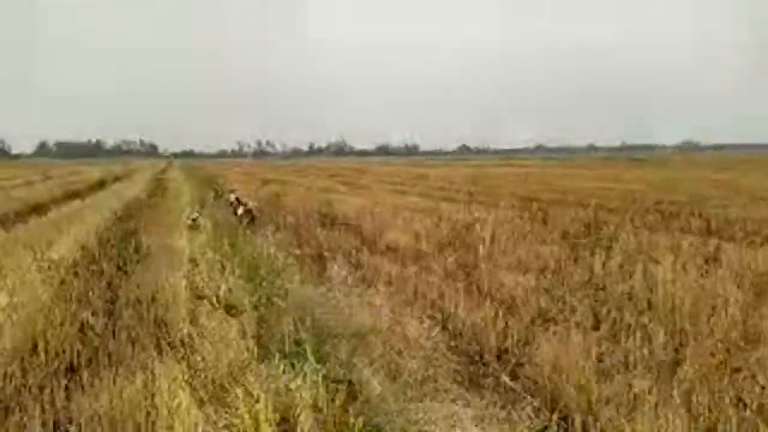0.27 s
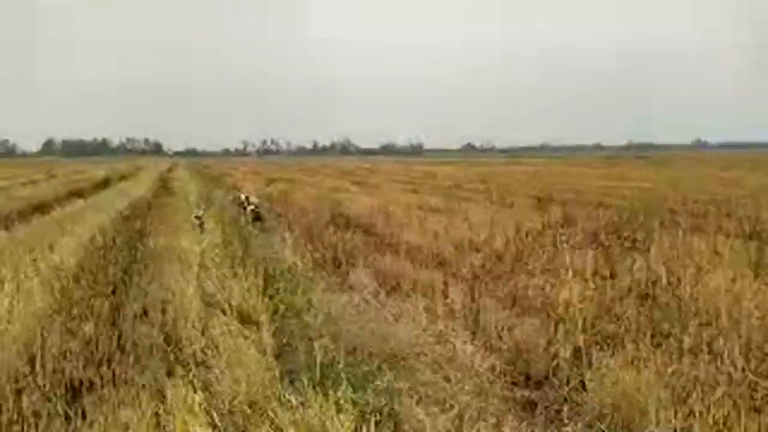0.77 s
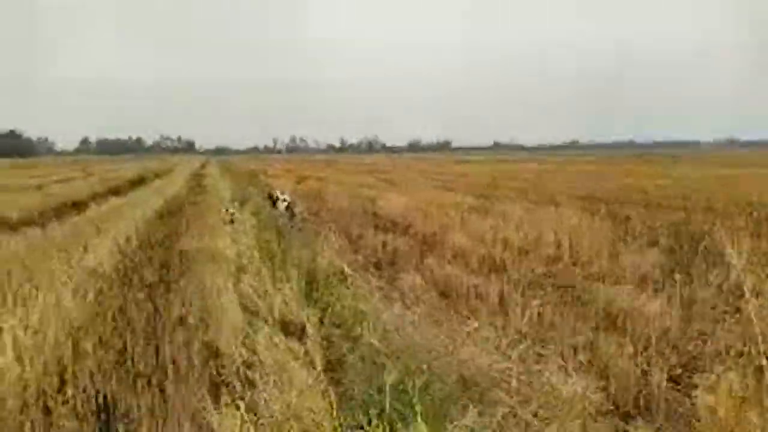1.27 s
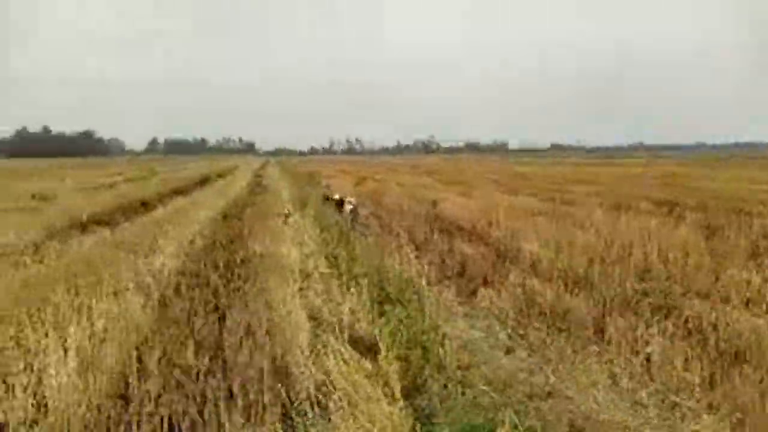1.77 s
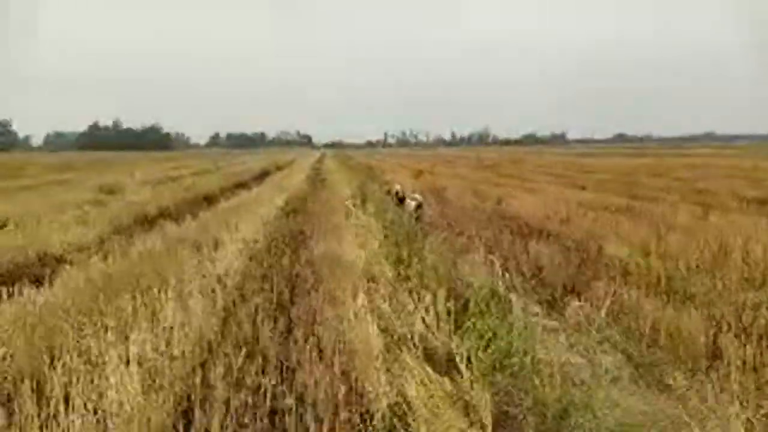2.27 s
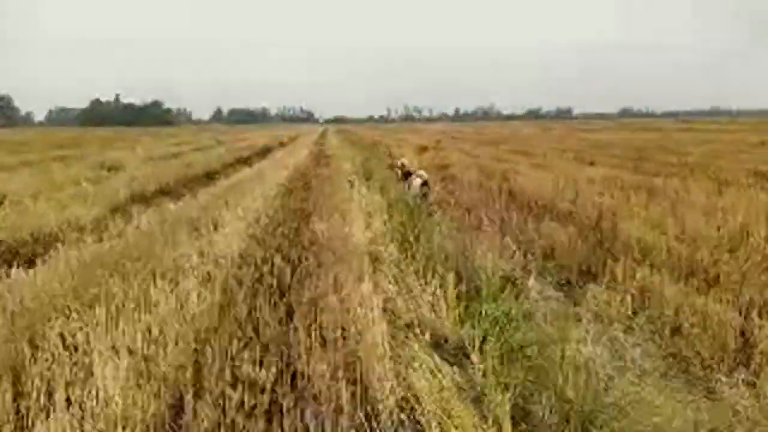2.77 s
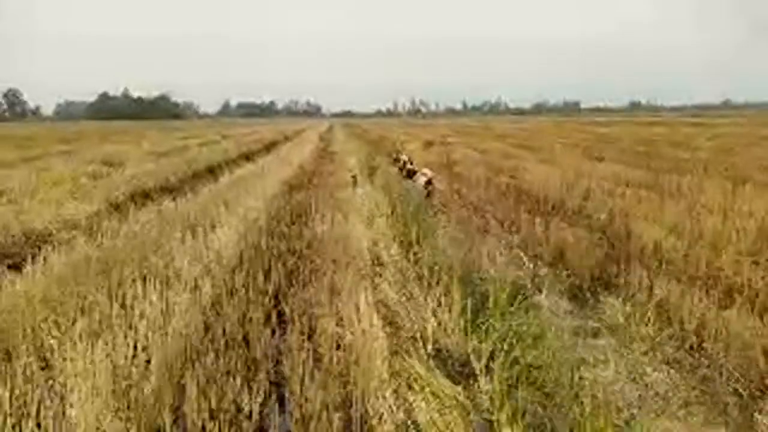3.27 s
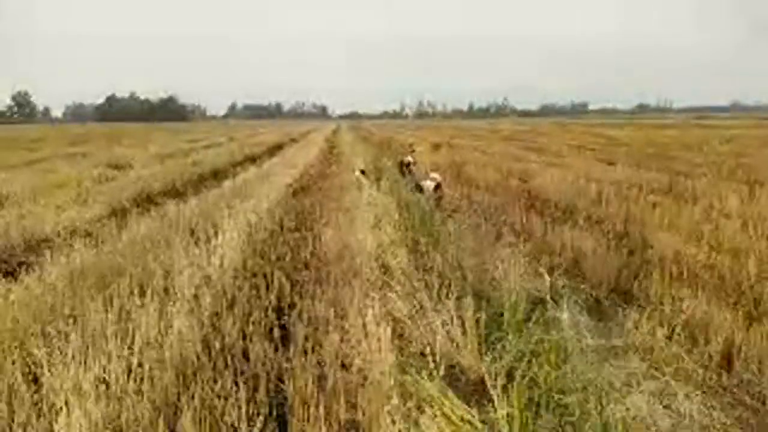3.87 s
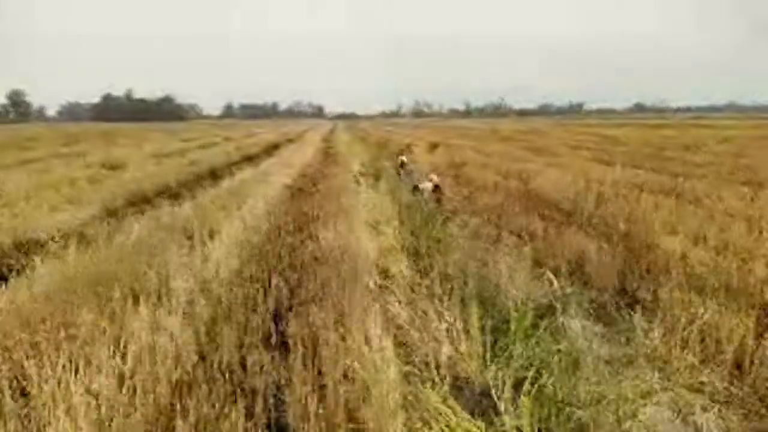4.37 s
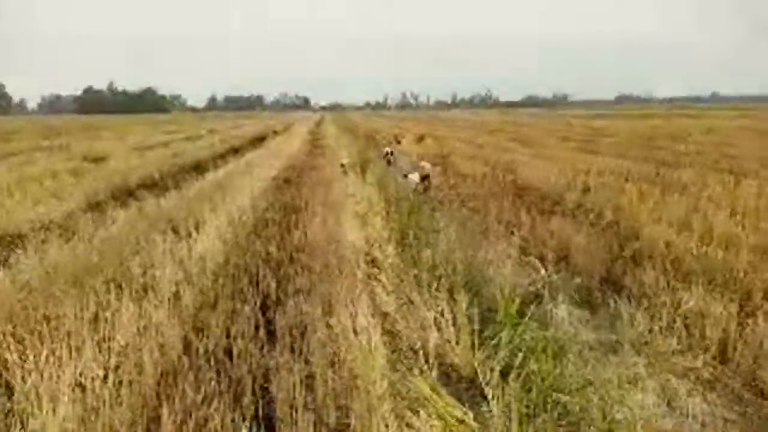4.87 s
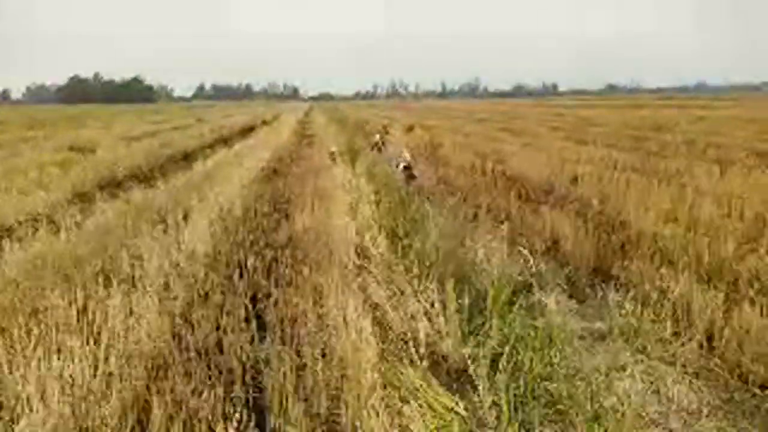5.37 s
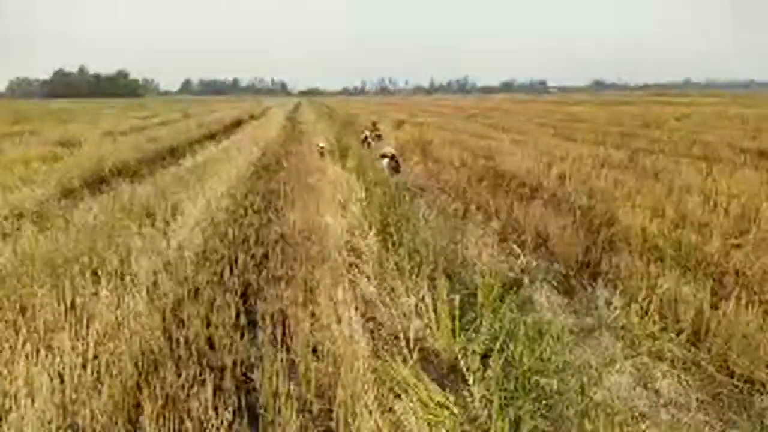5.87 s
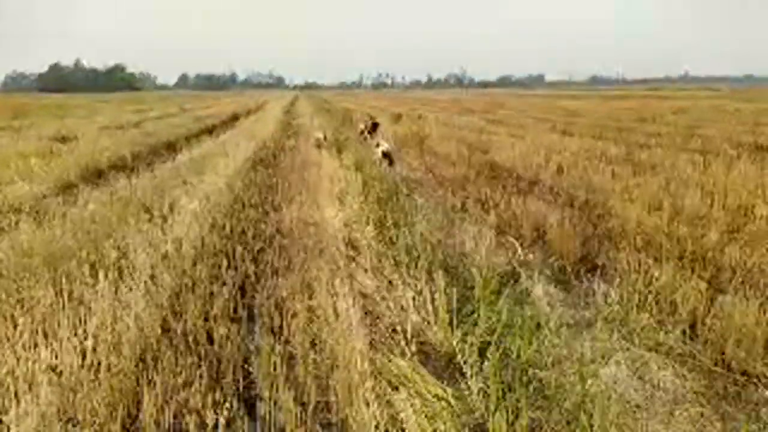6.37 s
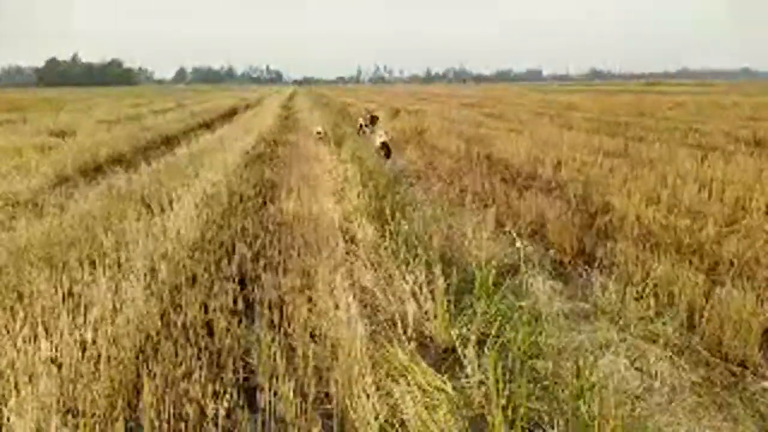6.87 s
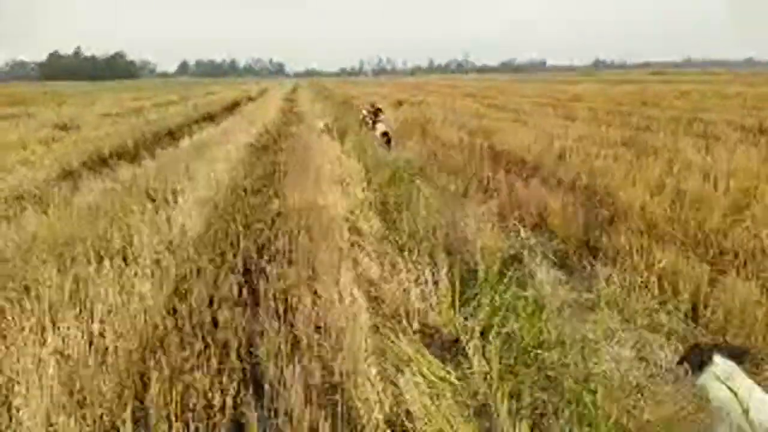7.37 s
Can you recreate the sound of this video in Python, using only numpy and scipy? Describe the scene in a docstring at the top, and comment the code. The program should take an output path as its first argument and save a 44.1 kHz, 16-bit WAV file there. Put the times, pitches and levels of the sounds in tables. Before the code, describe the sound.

Someone walks through crackling dry straw, pauses briefly on damp soil, then goes on swishing and crunching.

```python
"""Footsteps through the dry stubble of a harvested field, dogs trotting along.
Legs sweep the stalks and papery leaves, and friction excites their fibres into a bright, fine rustle.
Underfoot, straw fractures, hollow stalks snap and ring, and pockets in the damp soil squeeze shut.
An engine drones far off, a few faint hoots sound near the end, and a little wind touches the microphone."""
import sys
import numpy as np
from scipy import signal
from scipy.fft import rfft, irfft
from scipy.io import wavfile
from scipy.ndimage import uniform_filter1d

SR = 44100
rng = np.random.default_rng(int(sys.argv[2]) if len(sys.argv) > 2 else 0)


def digitize_waveform(pressure):
    """Quantize a signal to 16-bit integers and store it at the path in sys.argv[1].

    Rows of a 2-D input are taken as channels; values are limited to [-1, 1].
    """
    field = np.atleast_2d(pressure).T
    bounded = np.clip(field, -1, 1)
    quanta = np.round(bounded * 32767).astype(np.int16)
    wavfile.write(sys.argv[1], SR, quanta)


N = 335590

# Levels in the tables are relative; each source applies its own gain.
# a leg sweeps through the stubble: start_s, swell_s, decay_s, leaf_db, stalk_db
LEG_SWEEPS = [(0.043, 0.058, 0.11, -37, -45.5), (0.196, 0.056, 0.1, -34, -44),
              (0.259, 0.092, 0.19, -34.0, -43), (0.53, 0.039, 0.09, -37.5, -51),
              (0.9, 0.053, 0.068, -41.5, -52.0), (1.176, 0.093, 0.048, -37, -44.5),
              (1.605, 0.069, 0.204, -40, -51), (1.838, 0.058, 0.11, -31.5, -40.0),
              (2.014, 0.043, 0.063, -36.5, -42.5), (2.222, 0.13, 0.18, -39.5, -50),
              (2.374, 0.17, 0.1, -37, -43.5), (2.649, 0.17, 0.085, -35.5, -43),
              (2.954, 0.11, 0.018, -37, -51), (3.225, 0.042, 0.25, -43.5, -54.0),
              (3.303, 0.16, 0.14, -43, -52.5), (3.437, 0.15, 0.091, -36.5, -44.5),
              (4.317, 0.11, 0.13, -43.5, -59.5), (4.83, 0.037, 0.16, -46.0, -62),
              (5.112, 0.088, 0.02, -42, -57.0), (5.28, 0.038, 0.15, -47, -60),
              (5.403, 0.035, 0.14, -43.5, -56), (5.67, 0.029, 0.073, -40, -47.5),
              (5.877, 0.03, 0.25, -41, -54), (5.994, 0.085, 0.081, -29.5, -43.0),
              (6.099, 0.056, 0.066, -33.5, -45.5), (6.525, 0.022, 0.21, -40.5, -54),
              (6.619, 0.1, 0.14, -40, -51), (6.697, 0.159, 0.087, -38, -51),
              (6.88, 0.096, 0.18, -35.0, -48), (7.08, 0.081, 0.142, -41.5, -51.5),
              (7.289, 0.048, 0.082, -35, -50.5), (7.398, 0.11, 0.026, -34.5, -55)]
# rustle between sweeps, sinking while the walker pauses: time_s, leaf_db, stalk_db
RUSTLE_FLOOR = [(0.0, -44.5, -52.5), (0.7, -43.5, -54), (1.1, -45.0, -54.5), (1.6, -41.5, -52),
                (2.6, -40.5, -51.5), (3.2, -42.5, -53), (3.9, -45, -56), (4.3, -51.5, -60.5),
                (4.75, -54, -70), (5.0, -50, -60.5), (5.8, -47.5, -61.5), (6.3, -41, -54),
                (6.9, -42.5, -62.5), (7.61, -37, -54)]
# brightness of the rustle, as the weight of the leaf tips: time_s, level_db
TIP_BALANCE = [(0, -0.5), (1.3, -4), (2.5, -1.5), (4.3, -1.5), (5.2, -7.5), (6.3, -5.5), (6.6, -2),
               (7.3, -5.5), (7.61, -7)]
# spectra of rubbed leaves, leaf tips, stalks, thick stalks and cracking straws: frequency_hz, level_db
LEAF_SPECTRUM = [(7300, -17), (7800, -21.5), (8150, -4.5), (9300, -3), (10000, 0), (11600, -1),
                 (12500, -2.5), (15000, -11.5)]
TIP_SPECTRUM = [(8000, -20), (11000, -5.5), (12500, -8.5), (16000, -3.5)]
STALK_SPECTRUM = [(4600, -37), (5300, 2), (6200, 2.5), (7300, -0.5), (9000, 1), (12000, -39)]
THICK_SPECTRUM = [(3500, -26), (4100, -4), (4900, 0.5), (5600, -19)]
CRACKLE_SPECTRUM = [(2500, -17), (4500, -3), (7000, -5.5), (9000, -1), (15000, -4)]
# a foot loads the straw: start_s, swell_s, decay_s, buckling_db, splintering_db, mat_db
FOOT_LOADS = [(0.04, 0.042, 0.15, -47, -48, -57), (0.21, 0.054, 0.118, -45.5, -44.5, -70),
              (0.249, 0.098, 0.095, -43.5, -43, -51.0), (0.386, 0.042, 0.068, -42.5, -43.5, -61),
              (0.53, 0.036, 0.14, -53, -52.5, -58.5), (0.868, 0.1, 0.046, -49, -54, -67),
              (1.22, 0.043, 0.08, -41.5, -43, -52.5), (1.366, 0.097, 0.14, -49, -65, -59),
              (1.62, 0.078, 0.11, -48.5, -49.5, -74), (1.785, 0.13, 0.13, -47, -44.0, -54),
              (1.925, 0.063, 0.016, -42, -47.0, -63.5), (2.003, 0.073, 0.058, -44.5, -45, -73),
              (2.382, 0.17, 0.09, -46, -44, -56.5), (2.6, 0.058, 0.077, -48, -61, -58.5),
              (2.769, 0.127, 0.03, -45.0, -54, -60), (3.381, 0.063, 0.17, -54, -49, -79.5),
              (3.417, 0.15, 0.17, -46.5, -45.5, -65.5), (4.95, 0.14, 0.021, -53.5, -66, -95.5),
              (5.094, 0.046, 0.046, -45, -66, -82), (5.29, 0.055, 0.097, -50.5, -57, -94.5),
              (5.438, 0.023, 0.14, -50.5, -65, -62), (5.68, 0.037, 0.16, -48, -53, -64.5),
              (5.864, 0.048, 0.071, -46.5, -52, -52.5), (5.972, 0.15, 0.2, -46.5, -51.0, -61),
              (6.76, 0.05, 0.31, -53.5, -57, -88.0), (6.95, 0.044, 0.11, -47.5, -52.5, -61),
              (7.276, 0.074, 0.047, -51, -68, -94), (7.438, 0.065, 0.047, -59, -57, -57.5)]
# crunch between footfalls: time_s, buckling_db, splintering_db, mat_db
CRUNCH_FLOOR = [(0.0, -53, -52, -70), (0.85, -55.5, -59, -70), (1.5, -51, -55, -79),
                (2.2, -53.0, -54.0, -72), (2.75, -48, -50, -69), (3.2, -54.5, -55, -72),
                (3.7, -56, -55.5, -82.0), (4.03, -63, -62, -89), (4.15, -78.5, -86, -86.5),
                (4.92, -74.5, -86, -91), (5.02, -69, -78, -88), (5.28, -69, -85, -83),
                (5.67, -80, -92, -95), (6.2, -61, -87, -93), (6.53, -65.5, -75, -91), (6.7, -58, -60, -80),
                (7.1, -54.0, -65.5, -73), (7.61, -57, -64, -76)]
# spectra of buckling straw, splinters and the trodden mat: frequency_hz, level_db
STRAW_SPECTRUM = [(950, -37.5), (1220, -8.5), (1500, -1.5), (1750, -2.5), (2150, -3), (2450, -8),
                  (2900, -37.5)]
SPLINTER_SPECTRUM = [(1900, -33), (2350, -0.5), (2700, 0), (3400, -0.5), (3900, -2), (4500, -10),
                     (5500, -26)]
MAT_SPECTRUM = [(520, -17), (720, -10.5), (880, -5.5), (1080, 1.5), (1300, -2.5), (1700, -16.5),
                (2300, -36.5)]
# thick stalks breaking: start_s, level_db, pitch_hz, splinter_offset_db
STALK_SNAPS = [(0.065, -28, 1620, -20), (0.094, -26.5, 4000, -11), (0.243, -26, 3000, -10),
               (0.288, -27.5, 1690, -18), (0.416, -23, 1650, -19), (0.553, -29.5, 1280, -5),
               (0.563, -25.5, 2900, -17), (0.573, -26, 1780, -9), (0.644, -25.5, 1150, -32),
               (0.691, -27.5, 1490, -37), (0.978, -29, 3430, -18), (1.245, -31, 2070, -8),
               (1.269, -28, 1520, -9), (1.278, -26.5, 2260, -13), (1.679, -29, 2100, -12),
               (1.883, -26.5, 1870, -0.5), (1.912, -32, 2760, -12), (1.985, -28, 1880, -12),
               (2.029, -31, 2840, -13), (2.111, -39, 1030, -7), (2.132, -35.5, 2350, -2),
               (2.282, -35, 2820, -9), (2.357, -31, 2670, -5), (2.828, -32, 3980, -8),
               (2.872, -31.5, 1650, -9), (2.882, -30, 1890, -6), (2.899, -34, 1600, -18),
               (3.059, -35, 3150, -0.5), (3.1, -35, 2150, -12), (3.361, -28.5, 2120, -9),
               (3.572, -34, 1440, -11), (3.688, -32.5, 2560, -6), (3.851, -38, 2380, -17),
               (3.972, -43, 3400, -5), (5.119, -40, 3960, -17), (5.14, -24.5, 1790, -36),
               (5.47, -34.5, 990, -17), (5.697, -32.5, 1780, -13), (5.718, -33, 1440, -17),
               (5.85, -39.5, 3000, 0.5), (5.904, -27.5, 1280, -23), (5.911, -30, 980, -24),
               (6.087, -32, 1750, 2), (6.991, -26.5, 1440, -6.5), (7.098, -35.5, 2310, -5)]
# thin straws flicking: start_s, level_db
STRAW_TICKS = [(0.0944, -26), (0.2463, -18), (0.5544, -21), (0.728, -16.5), (0.819, -22), (1.753, -22),
               (2.135, -19.5), (4.3834, -36), (4.978, -34), (5.19, -32), (5.308, -31), (5.38, -29),
               (5.4228, -29.5), (5.8286, -31), (6.088, -19), (6.9884, -19), (7.433, -17.5), (7.5033, -24)]
# damp ground squishing: start_s, level_db, pitch_hz, length_s
MUD_SQUISHES = [(1.088, -39.5, 1067, 0.046), (1.47, -46.5, 867, 0.079), (1.803, -43, 2320, 0.069),
                (4.245, -55.5, 1490, 0.079), (4.299, -58, 1710, 0.081), (4.45, -54, 1410, 0.061),
                (4.59, -61, 1650, 0.07), (4.631, -61, 2080, 0.042), (4.751, -53, 1425, 0.071),
                (4.78, -51, 2090, 0.065), (4.939, -50.5, 1950, 0.12), (5.045, -37, 2110, 0.057),
                (5.175, -42, 2300, 0.035), (5.31, -39, 1950, 0.1), (5.456, -43, 980, 0.061),
                (5.942, -39, 1190, 0.049), (7.468, -42, 1730, 0.066)]
# dull knocks on the ground: start_s, level_db, pitch_hz
CLOD_KNOCKS = [(0.09, -54.5, 268), (2.183, -44, 510), (3.078, -57, 560), (4.401, -60, 550),
               (4.753, -59, 534)]
# far hoots: start_s, length_s, level_db
HOOT_BURSTS = [(6.552, 0.046, -59.5), (6.661, 0.089, -59.5), (6.783, 0.036, -61.5), (7.178, 0.025, -58),
               (7.328, 0.035, -69), (7.38, 0.06, -65.5)]
# partials of a hoot: pitch_hz, level_db
HOOT_PARTIALS = [(535, -6), (601, -1.5)]
# harmonics of the engine's firing rate: harmonic_number, level_db
ENGINE_HARMONICS = [(1, -74.5), (3, -73.5), (4, -84)]
# strength of the wind on the microphone: time_s, level_db
GUST_LEVEL = [(0, -92), (5.1, -92), (5.25, -64), (5.45, -74), (5.6, -62.5), (5.82, -61), (5.92, -73),
              (6.2, -89), (7.61, -77)]
# spectra of that wind and of the open air: frequency_hz, level_db
WIND_SPECTRUM = [(25, -26), (50, -15), (75, -2), (110, -5), (160, -17.5), (300, -38), (1000, -62)]
AIR_SPECTRUM = [(25, -40), (45, -10), (65, -5.5), (110, 3), (170, -1), (300, -6), (550, -9), (900, -17),
                (3000, -55), (15000, -19)]


def rustle():
    """Stick-slip friction: legs rub stalks, papery leaves and their tips, and each slip rings a fibre."""
    leaf_gain, stalk_gain = strokes(LEG_SWEEPS, RUSTLE_FLOOR, uneven_db=0.75)
    tip_db, = in_time(TIP_BALANCE)
    # thick stalks rub only under a firm sweep and fade out below it
    firm_db, fade_db_per_db = -56, 1.7
    thick_db = fade_db_per_db * np.minimum(20 * np.log10(stalk_gain) - firm_db, 0)
    leaves = leaf_gain * from_db(-1.44) * fibres(
        LEAF_SPECTRUM, per_s=14000, spread_db=0, clump_db=1.5, damping=0.016, patchy_db=3.5, count=32)
    tips = leaf_gain * from_db(tip_db + 2) * fibres(
        TIP_SPECTRUM, per_s=16000, spread_db=2, clump_db=0.5, damping=0.55, patchy_db=2.5, count=8)
    stalks = stalk_gain * from_db(-1.5) * fibres(
        STALK_SPECTRUM, per_s=7900, spread_db=1.5, clump_db=1.6, damping=0.072, patchy_db=3, count=16)
    thick = stalk_gain * from_db(thick_db - 8) * fibres(
        THICK_SPECTRUM, per_s=2500, spread_db=1.5, clump_db=1.8, damping=0.06, patchy_db=3, count=8)
    return leaves + tips + stalks + thick + crackle(stalk_gain * from_db(thick_db))


def crackle(stir_gain, per_s=22, spread_db=3):
    """A Poisson process: stray straws crack at random, as strongly as the stubble is stirred."""
    sizes = from_db(-4 + spread_db * np.minimum(rng.exponential(1, N), 3))
    clicks = stir_gain * sizes * (rng.random(N) < per_s / SR)
    out = np.zeros(N)
    for at in np.flatnonzero(clicks):
        add(out, at / SR, 10 * clicks[at] * fracture(decay_s=0.0012, size=600))
    return coloured(out, CRACKLE_SPECTRUM)


def crunch():
    """Buckling under load: straw folds and splinters beneath the sole, and the mat is pressed flat."""
    buckling, splintering, pressing = strokes(FOOT_LOADS, CRUNCH_FLOOR, uneven_db=1.32)
    straw = buckling * from_db(-2.35) * fibres(
        STRAW_SPECTRUM, per_s=2500, spread_db=1.5, clump_db=1.5, damping=0.04, patchy_db=3, count=18)
    splinters = splintering * from_db(-0.22) * fibres(
        SPLINTER_SPECTRUM, per_s=3000, spread_db=2.5, clump_db=1.5, damping=0.31, patchy_db=0.5, count=12)
    mat = pressing * from_db(2.5) * fibres(
        MAT_SPECTRUM, per_s=1200, spread_db=3, clump_db=1.5, damping=0.074, patchy_db=4, count=12)
    return straw + splinters + mat


def strokes(rows, floor, uneven_db, rest_s=0.24):
    """Incoherent sources add in power: strokes swell and decay over a floor, giving one gain a layer."""
    t = np.arange(N) / SR
    power = from_db(in_time(floor)) ** 2
    for start_s, swell_s, decay_s, *layers_db in rows:
        span = slice(int(start_s * SR), int(start_s * SR) + SR)
        age_s = t[span] - start_s
        past_peak_s = np.maximum(age_s - swell_s, 0)
        # the leg has passed, or the foot is still, about rest_s after the peak
        decay = np.exp(-past_peak_s / decay_s - (past_peak_s / rest_s) ** 4)
        envelope = np.clip(age_s / swell_s, 0, 1) * decay
        power[:, span] += np.outer(from_db(layers_db), envelope) ** 2
    return np.sqrt(power) * from_db(uneven_db * drift(per_s=19.7))  # stalks give way unevenly


def fibres(spectrum, per_s, spread_db, clump_db, damping, patchy_db, count):
    """Impulse excitation: clumps of tiny slips and breaks ring a bank of fibres, held near unit power."""
    clumps = from_db(clump_db * drift(per_s=45))
    at = np.flatnonzero(rng.random(N) < per_s * clumps / SR)
    sizes = from_db(spread_db * np.minimum(rng.exponential(1, N)[at], 5))
    impulses = sizes * rng.choice([-1, 1], N)[at] * np.sqrt(clumps[at])
    fibre_index = rng.integers(0, count, N)[at]
    rings = 0
    for k, hz in enumerate(np.geomspace(spectrum[0][0], spectrum[-1][0], count)):
        clicks = np.full(N, 1e-18)
        struck = fibre_index == k
        # the fibres caught keep changing, so the colour shifts
        clicks[at[struck]] = impulses[struck] * from_db(patchy_db * drift(per_s=12.2)[at[struck]])
        rings = rings + resonate(clicks, hz, width_hz=damping * hz)
    rings = coloured(rings, spectrum)
    local_power = np.abs(uniform_filter1d(rings ** 2, size=3000))
    return rings / np.sqrt(local_power + 1e-12)


def fracture(decay_s, size=3000):
    """Brittle fracture: a flurry of tiny breaks dies away exponentially."""
    breaks = rng.choice([-1, 1], size) * rng.uniform(0.17, 1, size)
    return breaks * np.exp(-np.arange(size) / SR / decay_s)


def snaps():
    """Tube resonance: a hollow stalk rings briefly as it breaks; splinters crack over a wide band."""
    out = np.zeros(N)
    for start_s, level_db, hz, splinter_db in STALK_SNAPS:
        crack = fracture(decay_s=0.0029 * (1800 / hz) ** 0.3)  # thicker, lower stalks break more slowly
        tube = resonate(band(crack, 0.68 * hz, 1.52 * hz, order=3), hz, width_hz=0.17 * hz)
        splinters = band(crack, 1860, 7800, order=3)
        add(out, start_s, peak_at(tube, level_db - 3.5) + peak_at(splinters, level_db + splinter_db + 6.5))
    return out


def ticks():
    """Elastic release: thin straws spring free with a very short, bright click."""
    out = np.zeros(N)
    for start_s, level_db in STRAW_TICKS:
        click = band(fracture(decay_s=0.00094), 9400, 17700, order=3)
        add(out, start_s, peak_at(resonate(click, hz=9100, width_hz=5900), level_db))
    return out


def squishes():
    """Cavity resonance: air and water are squeezed from a mud pocket, whose note rises as it closes."""
    out = np.zeros(N)
    for start_s, level_db, hz, length_s in MUD_SQUISHES:
        progress = np.arange(9000) / SR / length_s
        flow = rng.standard_normal(2 * len(progress))
        hollow = resonate(resonate(flow, hz, width_hz=0.088 * hz), hz, width_hz=0.16 * hz)
        pitch_ratio = 1 + 0.121 * (np.minimum(progress, 1) - 0.3)
        rising = np.interp(np.cumsum(pitch_ratio), np.arange(len(hollow)), hollow)
        envelope = np.sqrt(progress) * np.exp(-3.5 * progress)
        add(out, start_s, peak_at(rising * envelope, level_db - 4))
    return out


def knocks():
    """Damped resonance: a clod of earth gives under a foot with a dull knock."""
    out = np.zeros(N)
    for start_s, level_db, hz in CLOD_KNOCKS:
        impact = band(fracture(decay_s=0.0012), 0.91 * hz, 1.11 * hz)
        add(out, start_s, peak_at(resonate(impact, hz, width_hz=130), level_db - 0.5))
    return out


def hoots(attack_s=0.022, decay_s=0.023):
    """Random modulation roughens two close partials into a hollow tone, heard far off in short bursts."""
    t = np.arange(N) / SR
    envelope, tone = np.zeros(N), np.zeros(N)
    for start_s, length_s, level_db in HOOT_BURSTS:
        attack = np.clip((t - start_s) / attack_s, 0, 1)
        release = np.exp(-np.maximum(t - start_s - length_s, 0) / decay_s)
        envelope += from_db(level_db + 5) * attack * release
    for hz, level_db in HOOT_PARTIALS:
        gain = from_db(level_db + 4.2 * drift(per_s=43))
        pitch_hz = hz * (1 + 0.0187 * drift(per_s=26.4))
        tone += gain * np.sin(2 * np.pi * np.cumsum(pitch_hz) / SR)
    return envelope * tone


def engine(firing_hz=68.14):
    """Periodic firing gives a harmonic series: a far engine drones on a few low, wavering harmonics."""
    phase = 2 * np.pi * np.cumsum(firing_hz * (1 + 0.0042 * drift(per_s=3.8))) / SR
    return sum(np.sqrt(2) * from_db(level_db + 1.2 * drift(per_s=1.6)) * np.sin(harmonic * phase)
               for harmonic, level_db in ENGINE_HARMONICS)


def wind():
    """Turbulence: an uneven gust buffets the microphone over the low murmur of open air."""
    gust_db, = in_time(GUST_LEVEL)
    air = from_db(-68.5) * rms_one(coloured(rng.standard_normal(N), AIR_SPECTRUM))
    gust_gain = from_db(gust_db + 2 * drift(per_s=14))
    return air + gust_gain * rms_one(coloured(rng.standard_normal(N), WIND_SPECTRUM))


def resonate(x, hz, width_hz):
    """A damped two-pole resonator with unit gain at its peak."""
    radius = np.exp(-np.pi * width_hz / SR)
    feedback = [1, -2 * radius * np.cos(2 * np.pi * hz / SR), radius ** 2]
    return signal.lfilter(np.array([1, 0, -1]) * (1 - radius ** 2) / 2, feedback, x)


def band(x, low_hz, high_hz, order=2):
    """A maximally flat band-pass filter."""
    return signal.sosfilt(signal.butter(order, [low_hz, high_hz], "band", fs=SR, output="sos"), x)


def coloured(x, spectrum, size=8192):
    """A minimum-phase filter follows a spectrum and falls away beyond its ends."""
    hz, db = np.transpose(spectrum)
    octave = np.log2(np.maximum(np.arange(size // 2 + 1) * SR / size, 1))
    octaves_beyond = np.abs(octave - np.clip(octave, np.log2(hz[0]), np.log2(hz[-1])))
    response_db = np.interp(octave, np.log2(hz), db) - 20 * np.minimum(octaves_beyond, 2)
    cepstrum = irfft(np.log(from_db(response_db)))
    # folding the cepstrum onto positive time makes the filter causal
    cepstrum[1:size // 2] *= 2
    cepstrum[size // 2 + 1:] = 0
    return signal.oaconvolve(x, irfft(np.exp(rfft(cepstrum))))[:N]


def drift(per_s):
    """Low-passed noise of unit power that changes about per_s times a second."""
    hop, warm_up = 40, 2000
    pole = np.exp(-2 * np.pi * hop * per_s / SR)
    noise = rng.standard_normal(N // hop + warm_up + 2)
    slow = signal.lfilter([1], [1, -2 * pole, pole ** 2], noise)[warm_up:]
    return np.interp(np.arange(N) / hop, np.arange(len(slow)), rms_one(slow))


def in_time(rows):
    """Linear interpolation of each column of a curve, sample by sample."""
    time_s, *columns = np.transpose(rows)
    return [np.interp(np.arange(N) / SR, time_s, column) for column in columns]


def from_db(db):
    """Decibels to amplitude ratio."""
    return 10 ** (np.asarray(db) / 20)


def rms_one(x):
    """Normalisation to unit power."""
    return x / np.sqrt(np.mean(x ** 2) + 1e-20)


def peak_at(x, db):
    """Normalisation to a peak level."""
    return from_db(db) * x / np.abs(x).max()


def add(out, start_s, sound):
    """Superposition of a short sound at a given time."""
    at = round(start_s * SR)
    out[at:at + len(sound)] += sound[:N - at]


def scene():
    """Superposition: all sources sum at one microphone, heard alike in both ears."""
    sound = rustle() + crunch() + snaps() + ticks() + squishes() + knocks() + engine() + hoots() + wind()
    return np.stack([sound, sound])


def record(dry, cutoff_hz=15800):
    """Band limiting: a steep elliptic low-pass removes the highest treble."""
    return signal.sosfilt(signal.ellip(12, 0.1, 80, cutoff_hz, fs=SR, output="sos"), dry)


dry = scene()
out = record(dry)
digitize_waveform(out)
```